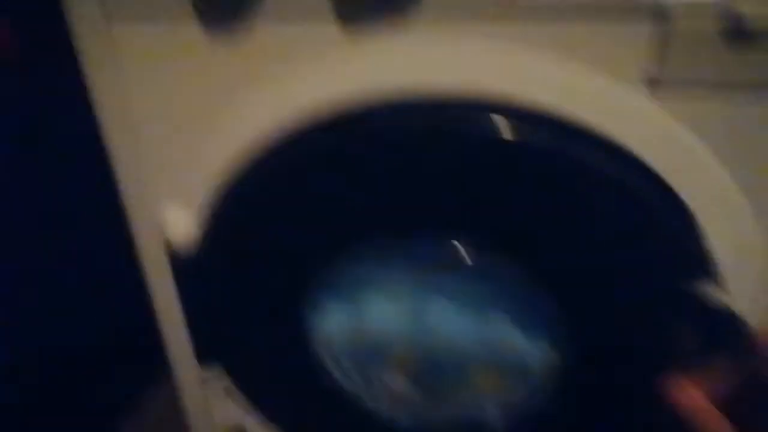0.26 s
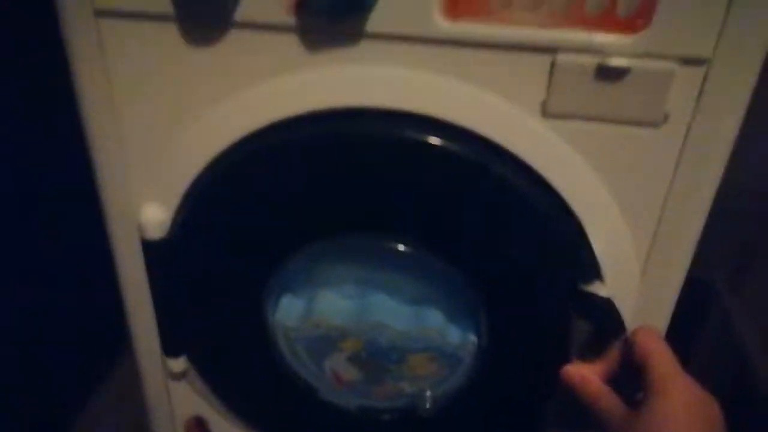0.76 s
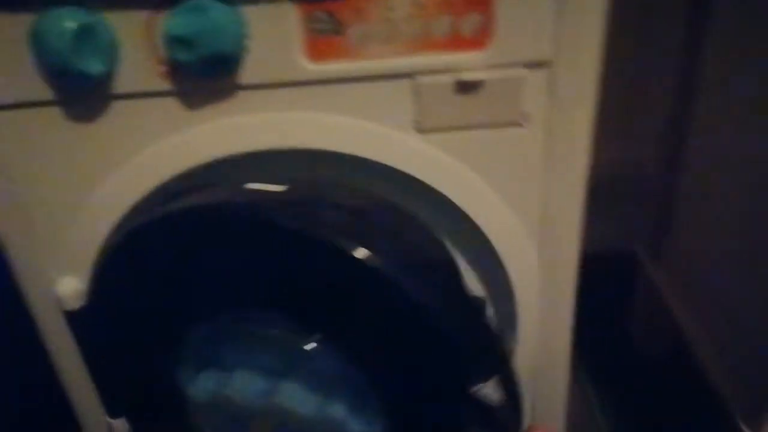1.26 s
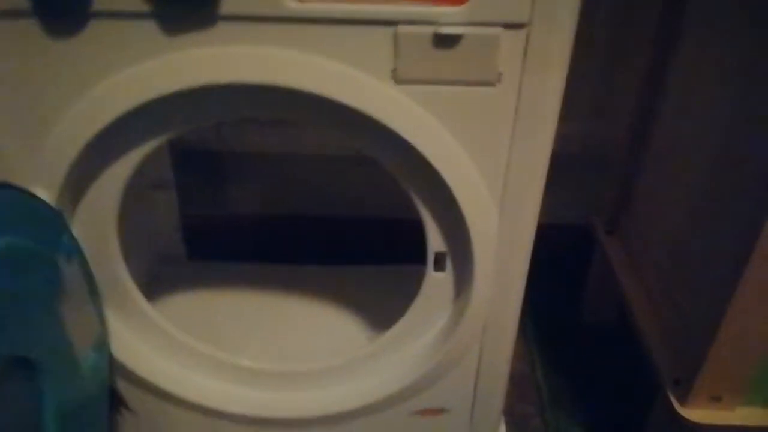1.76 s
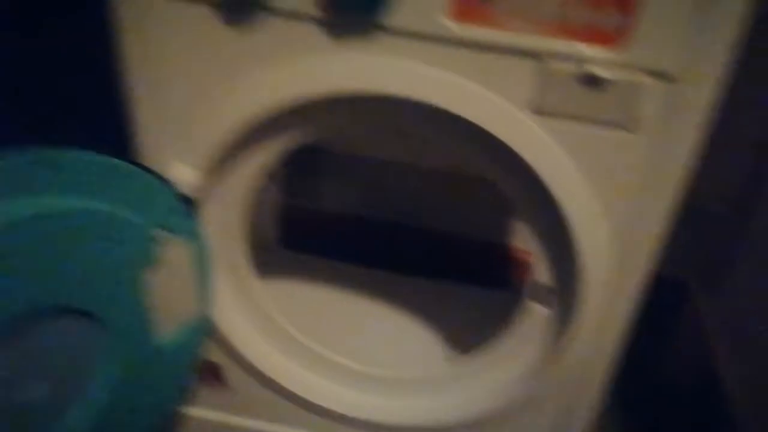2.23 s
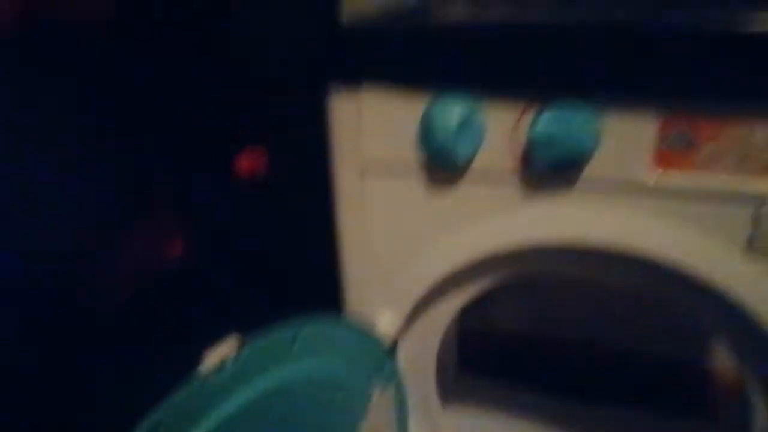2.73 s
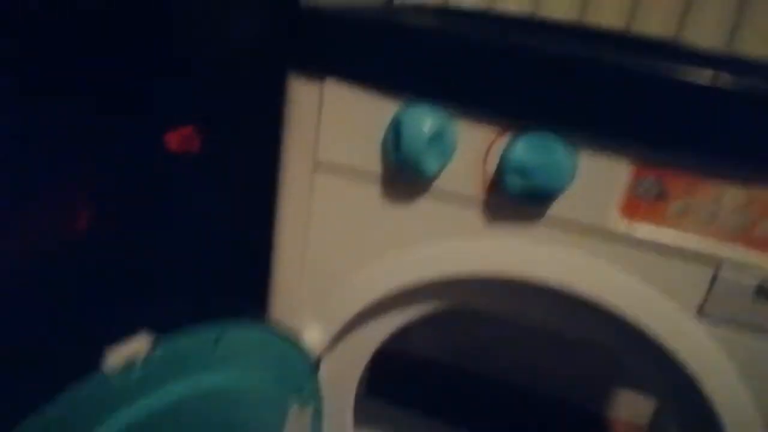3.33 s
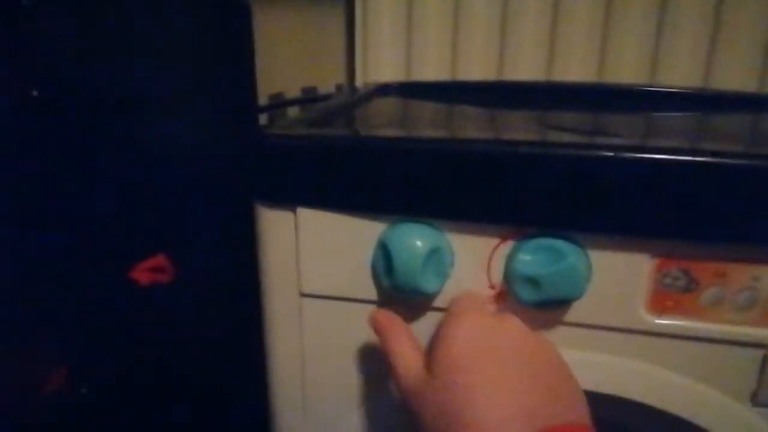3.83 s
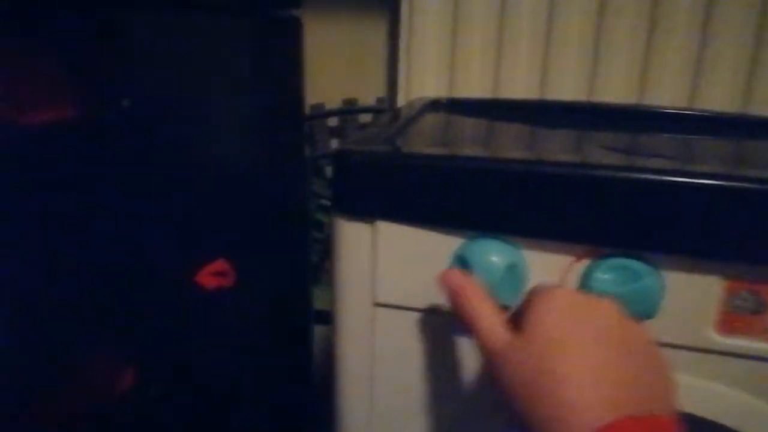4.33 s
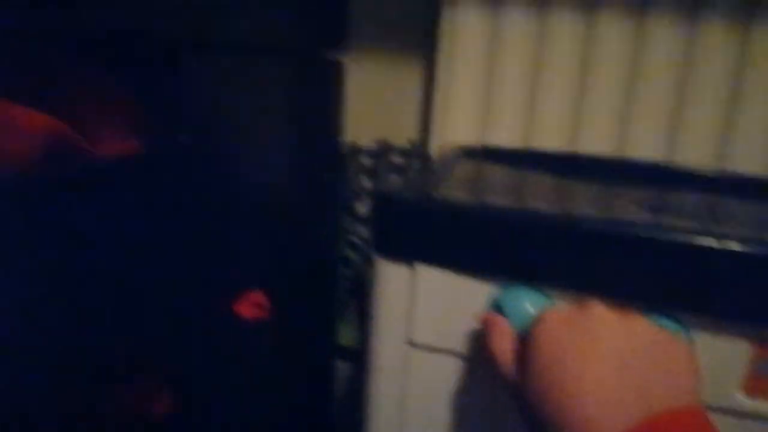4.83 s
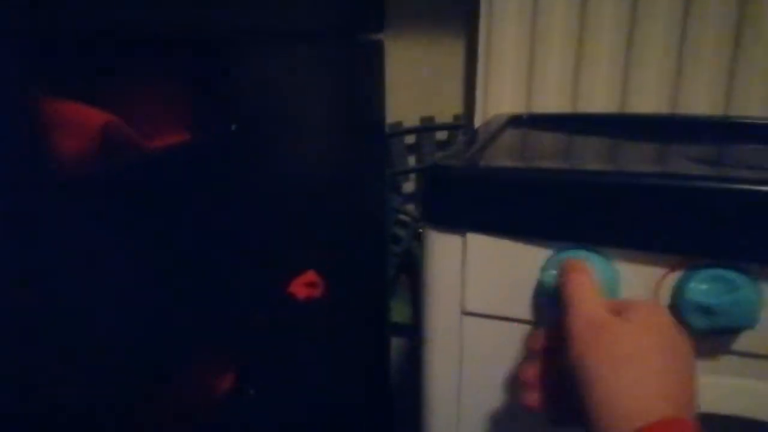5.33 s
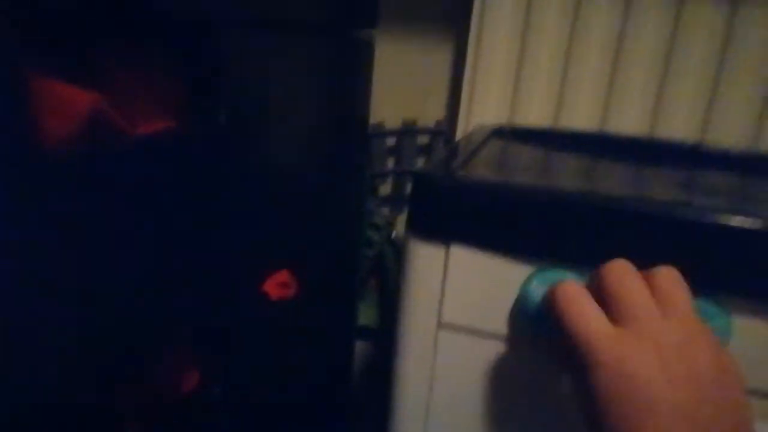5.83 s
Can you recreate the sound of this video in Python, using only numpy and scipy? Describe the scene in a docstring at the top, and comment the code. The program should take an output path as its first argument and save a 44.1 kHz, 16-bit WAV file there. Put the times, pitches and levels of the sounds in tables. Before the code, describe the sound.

Hollow plastic clicks and knocks from a toy washer's door opening, followed by light ticks and crisp ratcheting from a knob turned by hand.

```python
"""Toy washing machine: door and ratchet knob

A hand unlatches the plastic door, lets it swing against its stop, then turns a ratchet knob.
Each impact excites the damped modes of cabinet, door or knob in a small, quiet room; harder
contacts are brighter and crack more. Latch and hinge rub by stick-slip friction over a faint hum.
The phone's left microphone port is covered, so that side hears a late, muffled copy."""
import sys
import numpy as np
from scipy import signal
from scipy.fft import rfft, irfft
from scipy.io import wavfile

SR = 44100
rng = np.random.default_rng(int(sys.argv[2]) if len(sys.argv) > 2 else 0)


def store_pcm(level_fs):
    """Save levels as 16-bit WAV."""
    pcm = np.round(np.clip(level_fs, -1, 1) * 32767).astype(np.int16)
    wavfile.write(sys.argv[1], SR, np.atleast_2d(pcm).T)


N = 268128
TIME = np.arange(N) / SR
RING_SIZE = 16384
RING_TIME = np.arange(RING_SIZE) / SR


def undb(db):
    """Decibels to amplitude ratio."""
    return 10 ** (np.asarray(db) / 20)


def fade(t, t60):
    """Exponential decay of 60 dB in t60 seconds."""
    return np.exp(-np.log(1000) * t / t60)


def level(x, db):
    """Scaling to an rms level."""
    return x * undb(db) / np.sqrt(np.mean(x ** 2))


def blow(x, db):
    """Scaling of a transient to the energy of 2 ms at this level."""
    return x * undb(db) / np.sqrt(np.sum(x ** 2) / (.002 * SR))


def lowpass(x, hz, order):
    """Butterworth low-pass."""
    return signal.sosfilt(signal.butter(order, min(hz, SR / 2 - 1), fs=SR, output="sos"), x)


def highpass(x, hz, order):
    """Butterworth high-pass."""
    return signal.sosfilt(signal.butter(order, hz, "high", fs=SR, output="sos"), x)


def drift(hz):
    """Random modulation: low-passed noise of unit rms."""
    return level(lowpass(rng.standard_normal(N), hz, order=2), 0)


def minimum_phase(gain):
    """Folding the cepstrum gives the promptest impulse response with this magnitude spectrum."""
    cepstrum = irfft(np.log(gain))
    half = len(cepstrum) // 2
    cepstrum[1:half] *= 2
    cepstrum[half + 1:] = 0
    return irfft(np.exp(rfft(cepstrum)))


def colour(x, points, size=1024):
    """Spectral shaping through (frequency_hz, gain_db) points."""
    hz, db = np.transpose(points)
    bins = np.maximum(np.fft.rfftfreq(size, 1 / SR), 1)
    gain = undb(np.interp(np.log(bins), np.log(hz), db))
    return signal.fftconvolve(x, minimum_phase(gain))[:len(x)]


def add(track, start_s, x):
    """Superposition of x on the track."""
    start = int(start_s * SR)
    track[start:start + len(x)] += x[:max(N - start, 0)]


def room(x, t60_low=0.2, t60_high=0.18, split_hz=3500, first_s=0.0036, build_s=0.017):
    """Reverberation: reflections from close walls build into a tail whose treble dies first."""
    noise = rng.standard_normal(RING_SIZE)
    low = signal.sosfiltfilt(signal.butter(2, split_hz, fs=SR, output="sos"), noise)
    tail = low * fade(RING_TIME, t60_low) + (noise - low) * fade(RING_TIME, t60_high)
    tail *= np.clip((RING_TIME - first_s) / build_s, 0, 1)
    return signal.fftconvolve(x, tail / np.sqrt(np.sum(tail ** 2)))[:N]


def ringing(modes, scatter_db=1.2, jitter=.007):
    """Damped modal response: the contact point varies each mode's share, the pressing hand its pitch."""
    hz, db, t60 = np.transpose(modes)[:, :, None]
    gain = undb(db + scatter_db * rng.standard_normal(hz.shape))
    half_width = np.log(1000) / (2 * np.pi * t60)
    tuned_hz = hz * (1 + jitter * rng.standard_normal(hz.shape))
    detune = np.fft.rfftfreq(RING_SIZE, 1 / SR) - tuned_hz
    power = np.sum(gain ** 2 / (detune ** 2 + half_width ** 2), axis=0)
    return minimum_phase(np.sqrt(power))


def bend(x, spread_s):
    """Dispersion of bending waves: treble arrives first, 1 kHz about spread_s late."""
    hz = np.fft.rfftfreq(len(x), 1 / SR)
    phase_lag = 4 * np.pi * spread_s * np.sqrt(1000 * (hz + 100))
    return irfft(rfft(x) * np.exp(-1j * phase_lag))


def strikes(events, modes, crack_colour, snap_t60, shell_t60, shell_db, spread_s, radiate_hz,
            ring_wet_db, crack_wet_db, alike=.15):
    """Impact excitation: distinct modes ring, overlapping ones crack; soft contact dulls both."""
    rings, cracks = np.zeros(N), np.zeros(N)
    # a sharp snap at the contact, then the thin shell buzzes out
    envelope = fade(RING_TIME, snap_t60) + undb(shell_db) * fade(RING_TIME, shell_t60)
    own_grain = rng.standard_normal(RING_SIZE)
    for start_s, ring_db, contact_hz, crack_db in events:
        ring = lowpass(ringing(modes), contact_hz, order=2)
        ring = highpass(ring, radiate_hz, order=2)  # a small panel radiates little bass
        add(rings, start_s, blow(ring, ring_db))
        # alike is the share of the grain that repeats from blow to blow
        grain = np.sqrt(alike) * own_grain + np.sqrt(1 - alike) * rng.standard_normal(RING_SIZE)
        crack = lowpass(colour(envelope * grain, crack_colour), 2 * contact_hz, order=1)
        add(cracks, start_s, blow(crack, crack_db))
    rings = bend(np.pad(rings, (0, RING_SIZE)), spread_s)[:N]
    # the whole shell sends the crack to the walls, while the ring mostly faces the phone
    return rings + cracks + room(undb(ring_wet_db) * rings + undb(crack_wet_db) * cracks)


def contacts(knocks, even_hz, db_per_octave):
    """Contact hardness sets each knock's crack level, which equals its ring level at even_hz."""
    return [(s, db, hz, db + db_per_octave * np.log2(hz / even_hz)) for s, db, hz in knocks]


def chatter(knock, gap_s, loss_db, count):
    """Inelastic rebound: a loose part touches at uneven gaps, each time more weakly."""
    start_s, db, hz = knock
    gaps = gap_s * np.exp(.2 * rng.standard_normal(count))
    return [(start_s + gaps[:k].sum(), db - k * loss_db, hz) for k in range(count)]


# spectrum of the room air: frequency_hz, gain_db
ROOM_AIR = [(15, 23), (35, 20), (70, 15.5), (130, 9.5), (250, 8), (450, 5), (1500, -0.5), (5000, -4.5),
            (9000, -10.5), (15000, -19.5)]
# course of the appliance hum: time_s, level_db
HUM_LEVELS = [(0, -70), (1.5, -72), (2.4, -67), (3.6, -67), (4.1, -77.5), (5.0, -84.5), (5.7, -68.5),
              (6.08, -76)]
def background(air_db=-68, hum_hz=45, waver_hz=0.53):
    """Ambient noise: broadband room air and a household appliance's slightly wavering hum."""
    hum = np.sin(2 * np.pi * np.cumsum(hum_hz + waver_hz * drift(1.7)) / SR)
    hum_gain = undb(np.interp(TIME, *np.transpose(HUM_LEVELS)))
    air = colour(rng.standard_normal(N), ROOM_AIR, size=4096)
    return level(air, air_db) + level(hum, 0) * hum_gain


# spectrum of the microphone hiss: frequency_hz, gain_db
MIC_HISS = [(30, 7.5), (200, -4.5), (600, -8.5), (2000, -5.5), (5500, -7), (10000, -11), (15000, -14.5)]
def electronics(hiss_db=(-76, -77), whine_hz=810, wander_hz=5):
    """Self-noise: independent hiss in each microphone, and a thin whine with its fourth harmonic."""
    hiss = [level(colour(rng.standard_normal(N), MIC_HISS), db) for db in hiss_db]
    phase = 2 * np.pi * np.cumsum(whine_hz + wander_hz * drift(40)) / SR
    whine = level(np.sin(phase), db=-92) + level(np.sin(4 * phase), db=-86)
    return np.array(hiss) + np.outer([1, undb(-7)], whine)  # the whine is weaker on the right


# impacts on the cabinet: start_s, ring_db, contact_hz
CABINET_KNOCKS = [(.1405, -52, 1700), (.3349, -46.5, 1300), (.4903, -47.5, 1300), (.6353, -45.5, 1600),
                  (.9038, -38.5, 1900), (.9375, -40, 5000), (.9790, -35, 8800), (1.0745, -50, 16000),
                  (1.1225, -32.5, 260), (1.1365, -23, 337), (1.1890, -34, 1700), (1.4555, -49, 7000),
                  (1.4850, -49, 1200), (2.1150, -32, 12000), (3.7414, -50.5, 3100), (3.7676, -49.5, 2000),
                  (4.2950, -56, 600), (5.5770, -49.5, 12100), (5.6750, -55, 600)]
# cabinet resonances: pitch_hz, gain_db, t60_s
CABINET_MODES = [(185, 1, 0.096), (236.7, -3, 0.091), (297, -9, 0.067), (487, -5.5, 0.034),
                 (626, -21.5, 0.14), (844, -1, 0.026), (955, -25, 0.11), (1520, -5.5, 0.027),
                 (1840, -17, 0.041), (2430, -32.5, 0.011)]
# spectrum of the cabinet's crack: frequency_hz, gain_db
CABINET_CRACK = [(100, -37.5), (600, 3.5), (1600, 3.5), (3000, -3), (4500, -4), (6800, -7.5), (9000, -18),
                 (15000, -43.5)]
def cabinet_knocks():
    """Shell vibration: fingers, latch and hinge excite the modes of the hollow cabinet."""
    events = contacts(CABINET_KNOCKS + catches(), even_hz=8000, db_per_octave=3.5)
    return strikes(events, CABINET_MODES, CABINET_CRACK, snap_t60=0.014, shell_t60=0.062, shell_db=6.5,
                   spread_s=0.00051, radiate_hz=170, ring_wet_db=-11, crack_wet_db=-10)


# strokes of latch and hinge: start_s, length_s, level_db
RUB_STROKES = [(0.361, 0.38, -71.5), (0.924, .022, -54.5), (.98, .22, -59.5), (1.072, 0.034, -53),
               (1.42, 0.12, -71.5)]
# spectrum of the friction: frequency_hz, gain_db
RUB_COLOUR = [(100, 7), (600, -17), (950, 3), (1200, -12), (1600, 0), (3000, -2), (4400, 1), (5400, -2.5),
              (6800, -12), (9000, -39.5), (15000, -24)]
def rubbing(slips_per_s=2500, uneven_db=2, grab_db=1, attack_s=0.002, t60_s=0.041, wet_db=-6):
    """Stick-slip friction: dense slips grab and ease as the latch drags and the hinge turns."""
    slips = (rng.random(N) < slips_per_s / SR) * undb(uneven_db * rng.standard_normal(N))
    slips *= rng.standard_normal(N)
    grab = undb(grab_db * drift(54))
    envelope = np.zeros(N)
    for start_s, length_s, db in RUB_STROKES:
        t = TIME - start_s
        envelope += undb(db) * np.clip(t / attack_s, 0, 1) * fade(np.maximum(t - length_s, 0), t60_s)
    rub = level(colour(slips * grab, RUB_COLOUR), 0) * envelope
    return rub + undb(wet_db) * room(rub)


def catches(contact_hz=1500, scatter_db=6, count=3):
    """Frictional judder: a few small knocks fall at random within each rubbing stroke."""
    shape = (len(RUB_STROKES), count)
    places, offsets_db = rng.random(shape), scatter_db * rng.standard_normal(shape)
    return [(start_s + length_s * places[i, k], db + offsets_db[i, k], contact_hz)
            for i, (start_s, length_s, db) in enumerate(RUB_STROKES) for k in range(count)]


# the door comes free, later meets its stop and rebounds: start_s, ring_db, contact_hz
DOOR_KNOCKS = [(1.3824, -58, 900), (1.4222, -53, 7700), (2.1015, -34, 6000), (2.1606, -20, 1330),
               (2.1945, -39, 800)]
# the hard blow that sets it chattering: start_s, ring_db, contact_hz
DOOR_SLAM = (2.1043, -26, 8000)
# door resonances: pitch_hz, gain_db, t60_s
DOOR_MODES = [(443, -14.5, 0.085), (630, -28, 0.033), (765, -4.5, 0.11), (967, 10.5, 0.028),
              (1002, 4, 0.042), (1257, 6.5, 0.036), (1420, 2, 0.02), (2980, -13.5, 0.025),
              (2900, -22.5, 0.071), (4150, -7, 0.031), (4880, -5, .10), (7020, 4.5, 0.048)]
# spectrum of the door's crack: frequency_hz, gain_db
DOOR_CRACK = [(100, -14.5), (400, 3.5), (1200, 4), (2000, -3.5), (3200, 3), (4500, 8), (5800, -1.5),
              (7500, -7), (9000, -19), (15000, -30)]
def door_knocks():
    """Plate vibration: the door rings at each knock and as it chatters against its stop."""
    rebounds = chatter(DOOR_SLAM, gap_s=.0045, loss_db=5, count=4)
    events = contacts(DOOR_KNOCKS + rebounds, even_hz=3400, db_per_octave=7.5)
    return strikes(events, DOOR_MODES, DOOR_CRACK, snap_t60=0.012, shell_t60=.08, shell_db=0,
                   spread_s=0.0011, radiate_hz=480, ring_wet_db=-19, crack_wet_db=-12.5)


# shifts of the grip on the phone: start_s at the pulse's centre, peak_db, pitch_hz
GRIP_BUMPS = [(2.564, -46.5, 80), (2.677, -53.5, 58), (2.713, -50.5, 27), (3.056, -60, 99),
              (3.105, -55, 9.1), (5.773, -53.5, 62)]
def grip():
    """Structure-borne sound: each shift of the grip gives the phone's case one push-pull swing."""
    bumps = np.zeros(N)
    for centre_s, peak_db, hz in GRIP_BUMPS:
        phase = 2 * np.pi * hz * (TIME - centre_s)
        bumps -= undb(peak_db) * phase * np.exp((1 - phase ** 2) / 2)
    return bumps


# a fingertip on the panel: centre_s, peak_db, pitch_hz, half_length_s
SQUEAK = (3.796, -57, 2800, .006)
def squeak():
    """Stick-slip oscillation: skin on smooth plastic gives a brief tone."""
    centre_s, peak_db, pitch_hz, half_length_s = SQUEAK
    envelope = undb(peak_db) * np.exp(-((TIME - centre_s) / half_length_s) ** 2)
    return envelope * np.sin(2 * np.pi * pitch_hz * TIME)


# a finger nudges the loose knob on its shaft: start_s, ring_db
KNOB_NUDGES = [(4.1923, -51.5), (4.2761, -58.5), (4.4509, -46), (4.4580, -38), (4.6705, -50.5),
               (4.7000, -48.5), (5.5676, -45), (5.745, -34.5), (5.7595, -44), (5.8049, -24.5)]
# resonances of the knob's hollow cap: pitch_hz, gain_db, t60_s
CAP_MODES = [(312, -10.5, 0.035), (525, -11.5, .03), (866, -9, 0.027), (1481, -0.5, 0.031),
             (1714, -1, 0.026), (2200, -11, .02), (3070, -8, .015), (4460, 0, 0.017)]
# spectrum of the knob's crack, shared by the pawl: frequency_hz, gain_db
KNOB_CRACK = [(50, -15.5), (170, -24.5), (400, -5), (860, 5.5), (1030, -5), (1250, 9), (1750, 7),
              (3000, -2), (4300, 5), (6600, -4.5), (8000, -12), (9400, -15), (10800, -25.5), (15000, -29.5)]
def knob_nudges(contact_hz=2600, firm_db=-35, db_per_octave=26):
    """Backlash: the knob rocks once more in its play after a nudge; firmer contacts are harder."""
    rocks = []
    for start_s, db in KNOB_NUDGES:
        corner_hz = contact_hz * 2 ** ((db - firm_db) / db_per_octave)
        rocks += chatter((start_s, db, corner_hz), gap_s=0.004, loss_db=6.5, count=2)
    events = contacts(rocks, even_hz=14000, db_per_octave=3.5)
    return strikes(events, CAP_MODES, KNOB_CRACK, snap_t60=0.044, shell_t60=0.033, shell_db=-20,
                   spread_s=0.000705, radiate_hz=257, ring_wet_db=-20, crack_wet_db=-10)


# the pawl drops over a tooth: start_s, ring_db
PAWL_CLICKS = [(5.2196, -10), (5.309, -9.5), (5.3721, -8), (5.4383, -8.5), (6.0485, -9.5)]
# resonances of the knob's panel: pitch_hz, gain_db, t60_s
PANEL_MODES = [(225, -19, .06), (290, -19, .06), (385, -12, .05), (450, -14, .05), (586, -7, .05),
               (861, -4, .035), (1170, -5, .06), (1240, -7, .06), (1442, 0, .055), (1593, -4, .04),
               (1781, -1, .055), (1905, -11, .05), (2266, -4, .06), (2729, -10, .035), (3294, -16, .04),
               (3574, -12, .04), (3714, -11, .04), (4005, -6, .04), (4279, -5, .05), (4489, -7, .04),
               (4753, -7, .035), (5097, -10, .035), (6217, -13, .04), (6648, -11, .04)]
def pawl_clicks(contact_hz=7560, crack_over_ring_db=1.77):
    """Release of spring energy: the pawl lands on one spot with equal hardness, so clicks are alike."""
    events = [(start_s, db, contact_hz, db + crack_over_ring_db) for start_s, db in PAWL_CLICKS]
    return strikes(events, PANEL_MODES, KNOB_CRACK, snap_t60=0.032, shell_t60=0.075, shell_db=-10,
                   spread_s=0.000705, radiate_hz=305, ring_wet_db=-21.5, crack_wet_db=-11, alike=.55)


def hollow(x, top_hz=650, boom_db=-9):
    """Cavity reverberation: the empty cabinet holds the low part of each click a little longer."""
    return x + undb(boom_db) * room(lowpass(x, top_hz, order=4))


def ports(x, cover_hz=275, lag_s=0.00055):
    """Transmission loss: the covered left port passes mainly bass, and late; the right is open."""
    muffled = lowpass(x, cover_hz, order=1)
    return np.array([np.interp(TIME - lag_s, TIME, muffled), x])


def scene():
    """Superposition: airborne sound enters by the ports; grip bumps and self-noise bypass them."""
    pawl, knob = pawl_clicks(), knob_nudges()
    toy = cabinet_knocks() + door_knocks() + knob + hollow(pawl) + rubbing() + squeak()
    return ports(toy + background()) + grip() + electronics()


def record(dry, top_hz=16000):
    """Clipping and band limiting: the phone clips at full scale and cuts the top treble."""
    band_limit = signal.ellip(8, .2, 70, top_hz, fs=SR, output="sos")
    return signal.sosfilt(band_limit, np.clip(dry, -1, 1))


dry = scene()
out = record(dry)
store_pcm(out)
```